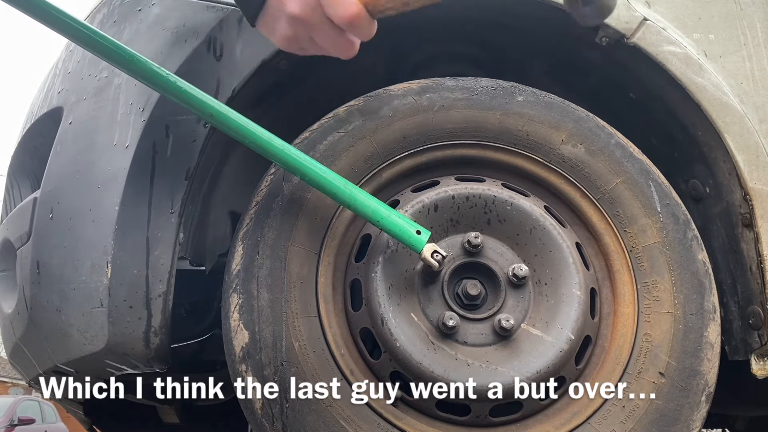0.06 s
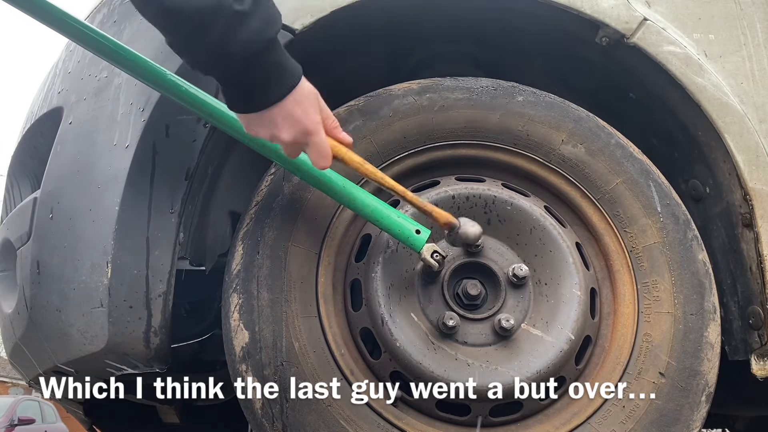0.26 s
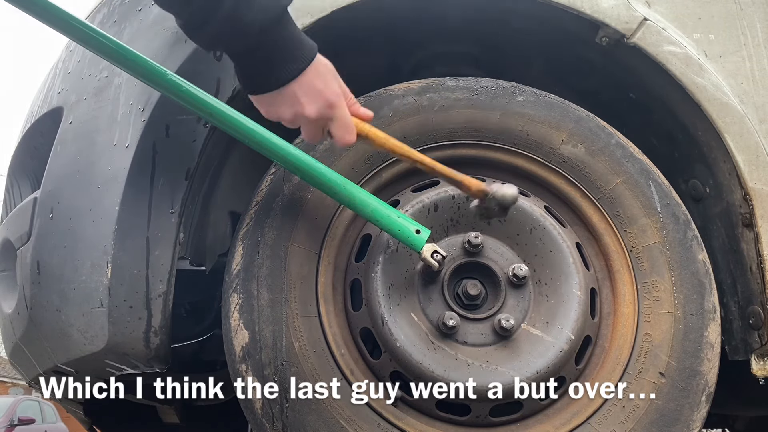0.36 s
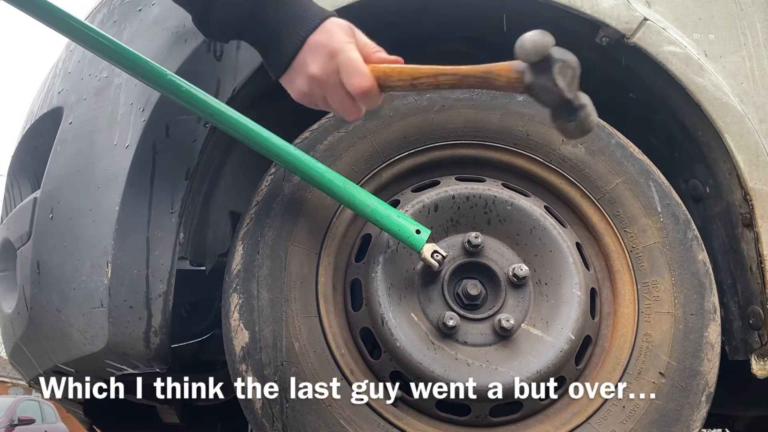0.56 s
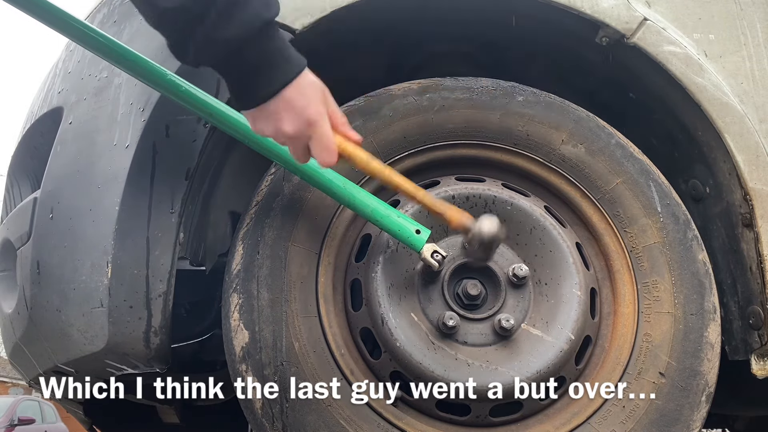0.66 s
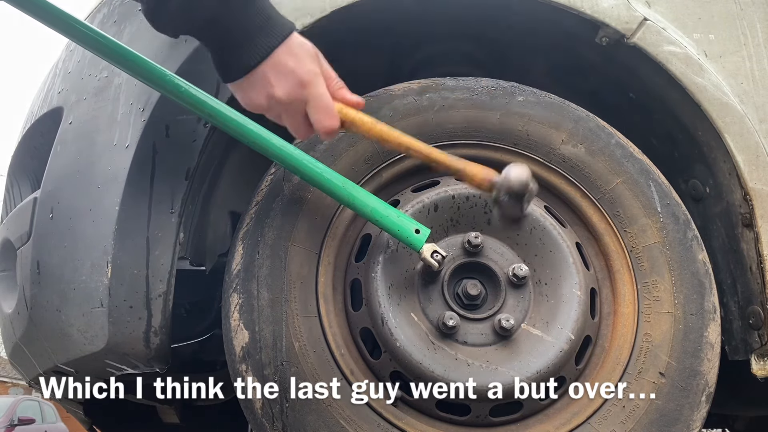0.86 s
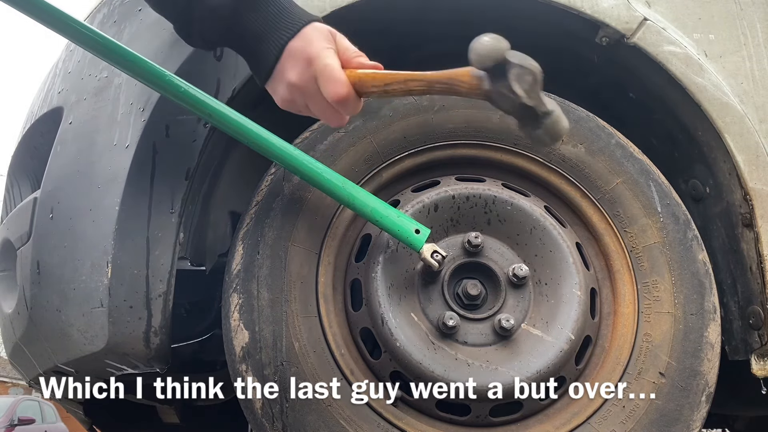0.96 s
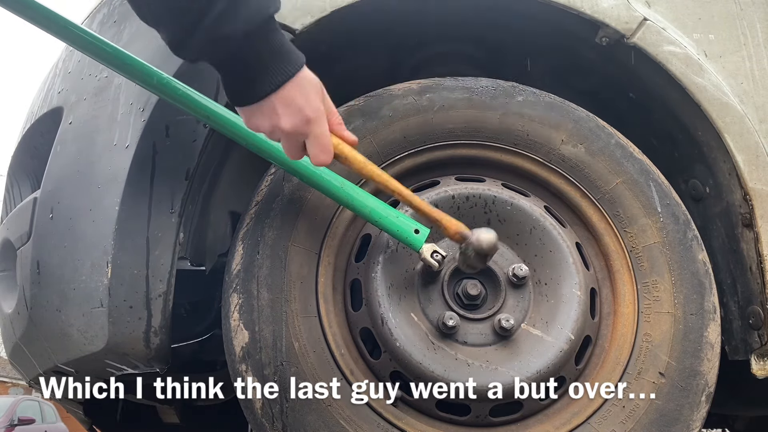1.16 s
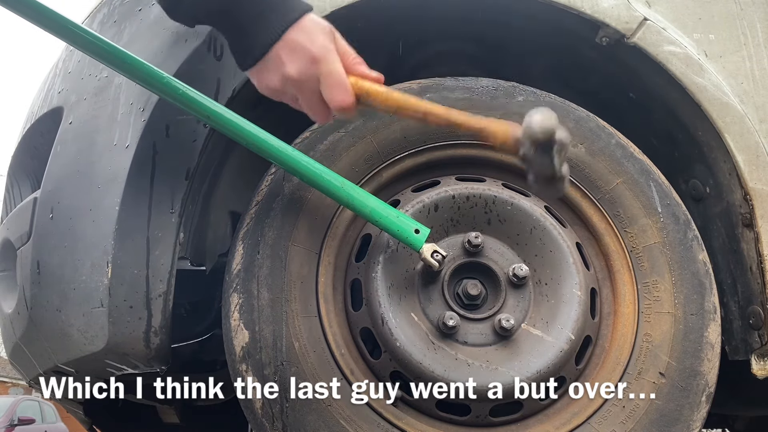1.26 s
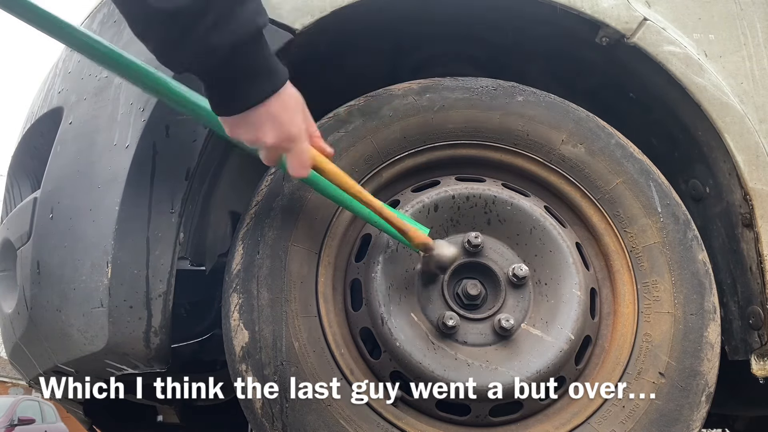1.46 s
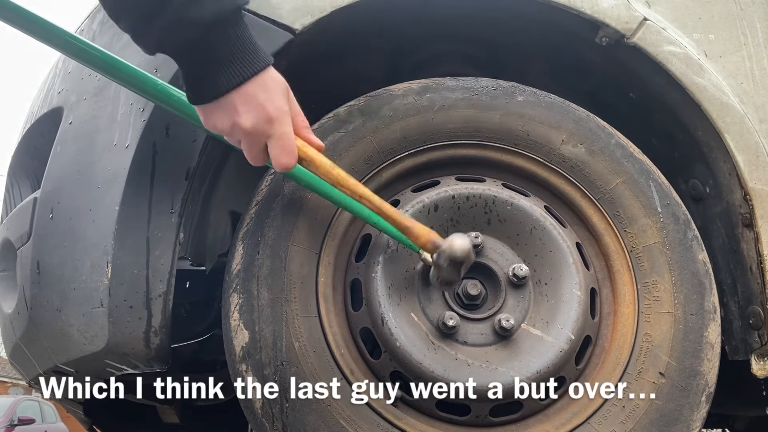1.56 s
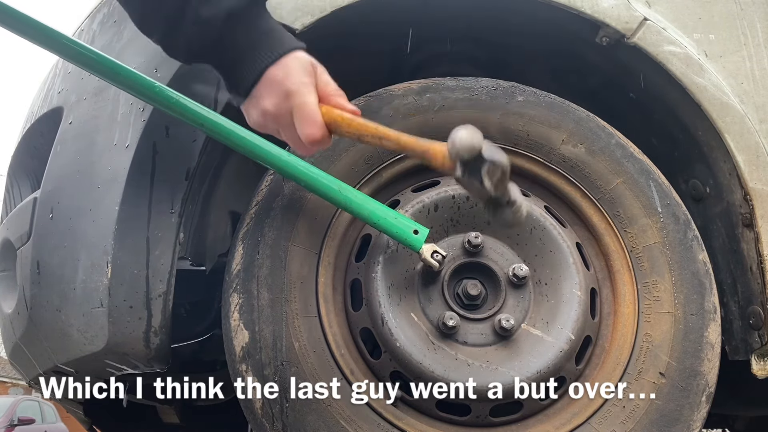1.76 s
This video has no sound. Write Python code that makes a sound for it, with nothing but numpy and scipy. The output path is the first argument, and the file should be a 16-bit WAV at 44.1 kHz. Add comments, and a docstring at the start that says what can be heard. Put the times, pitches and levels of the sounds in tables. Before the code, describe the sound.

A hammer strikes steel four times, each a sharp metallic clank with a thin ring.

```python
"""Hammering on a wheel nut

A hammer strikes a long steel bar, seated in a socket on a car's wheel nut, four times. Each blow is a hard
crack, a thud that falls in pitch as it spreads through wheel and tyre, a short clank and a thin ring of
steel. The car and nearby walls throw it back over a low rumble; a limiter ducks and recovers."""
import sys
import numpy as np
from scipy import signal
from scipy.fft import rfft, irfft
from scipy.io import wavfile
from scipy.ndimage import uniform_filter1d, minimum_filter1d

SR = 44100
rng = np.random.default_rng(int(sys.argv[2]) if len(sys.argv) > 2 else 0)


def wav_record(signal):
    """Record a signal, one row per channel, as 16-bit PCM in the file named by sys.argv[1]."""
    frames = np.transpose(np.atleast_2d(signal))
    bounded = np.clip(frames, -1, 1)
    # unit amplitude maps onto the largest positive 16-bit level
    quanta = np.round(bounded * 32767).astype(np.int16)
    wavfile.write(sys.argv[1], SR, quanta)


N = 79380
FREQS_HZ = np.fft.rfftfreq(N, 1 / SR)
LEFT_RIGHT = np.array([[.5], [-.5]])


def amp(db):
    """Decibels to gain."""
    return 10 ** (np.asarray(db) / 20)


def curve(points, hz):
    """Reads a table on a log-frequency axis."""
    knots_hz, values = np.transpose(points)
    return np.interp(np.log(hz + 1), np.log(knots_hz + 1), values)


def add(mix, start_s, sound):
    """Mixes a sound in from start_s."""
    part = mix[:, round(start_s * SR):]
    part += sound[..., :part.shape[1]]


def fade(t, t60):
    """Falls by 60 dB in t60 seconds."""
    return np.exp(-np.log(1000) * t / t60)


def noise(spectrum, likeness, eq_db=0):
    """Stereo noise with a given spectrum and left-right likeness, at unit rms before the EQ."""
    left, other = rfft(rng.standard_normal((2, N)))
    same, gain = curve(likeness, FREQS_HZ), amp(curve(spectrum, FREQS_HZ))
    pair = np.array([left, same * left + np.sqrt(1 - same ** 2) * other])
    return irfft(pair * gain * amp(eq_db) / np.sqrt(np.mean(gain ** 2)), N)


def tail(spectrum, likeness, decays):
    """Noise whose bands die at their own speeds."""
    hz, t, bands = signal.stft(noise(spectrum, likeness), SR, nperseg=1024, noverlap=768)
    bands *= fade(t, curve(decays, hz)[:, None])
    return signal.istft(bands, SR, nperseg=1024, noverlap=768)[1][:, :N]


def modes(t, table, rise_s=.0005, spread_rad=1.3, wide_hz=1500):
    """Dying sines; the high ones reach left and right out of step."""
    out = np.zeros((2, N))
    for (hz, db, t60), (phase, side) in zip(table, rng.random((len(table), 2))):
        apart = np.sign(side - .5) * spread_rad * min(hz / wide_hz, 1) * LEFT_RIGHT
        out += amp(db) * fade(t, t60) * np.sin(2 * np.pi * (hz * t + phase) + apart)
    return out * np.minimum(t / rise_s, 1)


# Dark background bed: freq_hz, level_db
RUMBLE_SPECTRUM = [(20, -22.5), (62, -5), (90, -5), (125, -6.5), (200, -16), (400, -21.5), (900, -22.5),
                   (1200, -34), (2700, -33.5), (5000, -47), (10000, -50), (16000, -65.5)]
# Distant stereo image, centred lows and wide highs: freq_hz, likeness
FAR_IMAGE = [(60, .98), (150, 1), (350, 0.38), (700, 0.041), (2000, 0.015), (14000, .02)]
def rumble():
    """A faint, steady low rumble."""
    return amp(-56) * noise(RUMBLE_SPECTRUM, FAR_IMAGE)


# Tick cue: start_s, level_db, t60_s
TOOL_TICK = (.0665, -49, 0.014)
# Its thin tone: freq_hz, level_db
TICK_SPECTRUM = [(1500, -26), (2800, 11), (4000, -10), (6500, 0), (10000, -40)]
# Close-up stereo image: freq_hz, likeness
CLOSE_IMAGE = [(100, 0.77), (400, 0.6), (900, 0.93), (2000, 0.55), (5000, 0.036), (14000, .1)]
def tool_tick(t, t60):
    """The tool gives a tiny tick before the first blow."""
    return fade(t, t60) * noise(TICK_SPECTRUM, CLOSE_IMAGE)


# Tone of the early reflections and of the walls' tail: freq_hz, level_db
EARLY_SPECTRUM = [(40, 6), (150, -3), (450, 0.5), (930, -2), (1130, -18), (1400, -7), (1900, -16),
                  (2800, -3.5), (3400, -21), (4400, -16), (7400, -16.5), (8500, -30), (10000, -16),
                  (12400, -41.5), (14400, -21.5), (15800, -47.5)]
ROOM_SPECTRUM = [(30, 5), (65, 18), (130, 11), (220, 2), (600, 0), (960, -5), (1130, -22.5), (1420, -2),
                 (1800, -14.5), (2750, -4.5), (3400, -11.5), (5500, -10.5), (7500, -13), (8500, -25),
                 (10000, -6.5), (12400, -28), (14300, -21.5), (15800, -37.5)]
# Their decay times: freq_hz, t60_s
EARLY_DECAY = [(100, 0.16), (600, 0.12), (3000, 0.13), (8000, .14), (15000, 0.16)]
ROOM_DECAY = [(60, 1), (250, 0.82), (1000, 0.84), (3000, 0.74), (7000, 0.73), (14000, 0.39)]
def reflections(t, room_db, early_rise_s=.009, room_rise_s=.021, bass_hz=127):
    """A quick spray off the car body and floor, then a long tail that booms more as room_db rises."""
    early = amp(1) * np.minimum(t / early_rise_s, 1) * tail(EARLY_SPECTRUM, CLOSE_IMAGE, EARLY_DECAY)
    room = tail(ROOM_SPECTRUM, FAR_IMAGE, ROOM_DECAY)
    bass = 1 / (1 + (FREQS_HZ / bass_hz) ** 4)
    room = irfft(rfft(room) * amp(room_db * (1 + .83 * bass)), N)
    return early + amp(-31) * np.minimum(t / room_rise_s, 1) * room


# The bar's note, a close pair of bending modes: pitch_hz, level_db, t60_s
BAR_MODES = [(2605, -27, .56), (2714, -14.5, .27)]
# Further modes of the bar ringing on: pitch_hz, level_db, t60_s
RING_MODES = [(587, -39, .62), (990, -43, .62), (1362, -31, .3), (2369, -33, .3), (2947, -33, .28),
              (4134, -33, .25), (5526, -32, .27), (7386, -25, .23), (7493, -23, .27), (11295, -40, .26)]
def steel_ring(t, bar_db, high_db, split_hz=5000):
    """The steel rings on; where the hammer lands sets the share of bar note and high modes."""
    note = sum(amp(db + bar_db) * fade(t, t60) * np.sin(2 * np.pi * hz * t) for hz, db, t60 in BAR_MODES)
    return note + modes(t, [(hz, db + high_db * (hz > split_hz), t60) for hz, db, t60 in RING_MODES])


# Socket and wheel resonances: pitch_hz, level_db, t60_s
CLANK_MODES = [(170.6, -12.5, 0.21), (407, -38.5, 0.23), (569.7, 5, 0.088), (782.5, -25, 0.23),
               (868.3, 11, 0.04), (1368, -12.5, 0.15), (2910, -16, 0.088), (3908, -24.5, 0.18),
               (4970, -35.5, .08), (8770, -4.5, 0.067), (10200, -17, 0.083)]
def clank(t):
    """Socket and wheel sound briefly, heavily damped."""
    return modes(t, CLANK_MODES)


def thud(t, fall_s, top_hz=893.3, end_hz=50.36, rise_s=.0038, decay_s=.008):
    """Bending waves arrive high notes first: a quick downward sweep."""
    hz = end_hz + (top_hz - end_hz) * np.exp(-t / fall_s)
    envelope = np.minimum(t / rise_s, 1) * np.exp(-np.maximum(t - fall_s, 0) / decay_s)
    return amp(8.5) * envelope * np.sin(2 * np.pi * np.cumsum(hz) / SR)


def tyre_thump(t, pitch_hz=56, rise_s=.0031):
    """The tyre takes the blow with a soft thump."""
    return amp(2.5) * t / rise_s * np.exp(-t / rise_s) * np.sin(2 * np.pi * pitch_hz * t)


# Brief tones that give each blow its own colour: start_s, pitch_hz, level_db
ACCENT_TONES = [(.2525, 2240, -25), (.2525, 2697, 13.5), (.2525, 4300, 12), (.2525, 6420, 11.5),
                (.7025, 1690, -0.5), (.7025, 2548, -2.5), (.7025, 5540, -5), (.7025, 5940, 4),
                (1.0964, 1325, 4.5), (1.0964, 2778, 1.5), (1.0964, 9360, 5), (1.4812, 1331, -2.5),
                (1.4812, 2060, -3), (1.4812, 4150, -5), (1.4812, 9880, -36.5)]
# Panning of accents and crack: freq_hz, left_minus_right_db
IMPACT_PAN = [(400, -3.5), (1400, -4), (2600, -9), (5000, 4.5), (14000, -3)]
def accent(t, hz, db, t60=.03):
    """One quickly dying tone, panned by its pitch."""
    return modes(t, [(hz, db, t60)]) * amp(curve(IMPACT_PAN, hz) * LEFT_RIGHT)


# Tone of the socket's chatter and of the bright snap: freq_hz, level_db
CHATTER_SPECTRUM = [(100, 1), (300, -11.5), (600, -16.5), (1100, -10.5), (1900, -4.5), (2700, -13.5),
                    (3400, -14), (4400, -8), (6500, -5), (8300, -11.5), (10000, 4), (12200, -19.5),
                    (14400, -7.5), (16500, -33)]
SNAP_SPECTRUM = [(300, -23), (1500, 1), (4000, -16), (7000, 6.5), (10000, 6), (12000, -7.5), (14200, 12.5),
                 (16500, -25)]
def crack(t, swell_s, chatter_s, mids_db, treble_db, snap_db, mids_hz=2920, treble_hz=9600):
    """Steel snaps on steel at t = 0; the socket chatters on the nut for a few milliseconds."""
    bell = np.exp(-np.log2((FREQS_HZ + 1) / mids_hz) ** 2 / 2)
    shelf = FREQS_HZ ** 4 / (FREQS_HZ ** 4 + treble_hz ** 4)
    eq_db = mids_db * bell + treble_db * shelf + curve(IMPACT_PAN, FREQS_HZ) * LEFT_RIGHT
    flutter = uniform_filter1d(rng.standard_normal(N), size=36)
    chatter = noise(CHATTER_SPECTRUM, CLOSE_IMAGE, eq_db) * amp(4 * flutter / flutter.std())
    mids = signal.sosfilt(signal.butter(4, 6900, fs=SR, output="sos"), chatter)
    swell = mids * np.exp(np.minimum(t, 0) / swell_s)  # leads into the hit
    dying = chatter * fade(np.maximum(t - chatter_s, 0), t60=.03)
    snap = amp(snap_db - 3) * (t >= 0) * fade(abs(t), t60=.036) * noise(SNAP_SPECTRUM, CLOSE_IMAGE)
    return amp(2.5) * np.where(t < 0, swell, dying) + snap


# Hammer cues with trims per layer: start_s, level_db, swell_s, chatter_s, mids_db, treble_db,
# snap_db, thud_db, fall_s, clank_db, room_db
HAMMER_BLOWS = [(0.2527, 4, 0.0023, 0.0092, 6.5, -9.5, 7.5, -0.5, 0.0043, -4.5, 2),
                (0.7011, -7, 0.0025, 0.0037, 8.5, -4.5, 13, 2, 0.0049, 0, -3),
                (1.0962, -8.5, 0.0024, 0.0058, 4.5, -6.5, 7, 1, 0.0041, 0, 1),
                (1.4808, -9, 0.0024, 0.0037, 1, 10.5, -3.5, -0.5, 0.00543, 0, -0.5)]
# Ring trims per blow: bar_db, high_db
RING_TRIMS = [(-2.5, -4), (-4, -10), (-16, 4), (-11, 5)]
def scene():
    """Four blows and a tick over a low rumble."""
    t = np.arange(N) / SR
    mix = rumble()
    for blow, (bar_db, high_db) in zip(HAMMER_BLOWS, RING_TRIMS):
        start_s, level_db, *crack_shape, thud_db, fall_s, clank_db, room_db = blow
        mix += amp(level_db) * crack(t - start_s, *crack_shape)
        body = amp(thud_db) * (thud(t, fall_s) + tyre_thump(t)) + amp(clank_db) * clank(t)
        sustain = steel_ring(t, bar_db, high_db) + reflections(t, room_db)
        add(mix, start_s, amp(level_db) * (body + sustain))
    for start_s, pitch_hz, level_db in ACCENT_TONES:
        add(mix, start_s, accent(t, pitch_hz, level_db))
    start_s, level_db, t60 = TOOL_TICK
    add(mix, start_s, amp(level_db) * tool_tick(t, t60))
    return mix


def record(dry):
    """A look-ahead limiter ducks the blows and recovers slowly; then a soft clip and a high cut."""
    threshold_db, recover_db_per_s, ceiling, cutoff_hz = -10.5, 79, .95, 16400
    power_db = 10 * np.log10(abs(uniform_filter1d((dry ** 2).mean(0), size=300)) + 1e-12)
    over_db = -minimum_filter1d(-np.maximum(power_db - threshold_db, 0), size=400)  # peak hold
    recovery_db = np.arange(N) * recover_db_per_s / SR
    duck_db = uniform_filter1d(np.maximum.accumulate(over_db + recovery_db) - recovery_db, size=130)
    clipped = ceiling * np.tanh(dry * amp(-duck_db) / ceiling)
    high_cut = signal.firwin(255, cutoff_hz, window=("kaiser", 9), fs=SR)
    return signal.oaconvolve(clipped, high_cut[None], "same")


dry = scene()
out = record(dry)
wav_record(out)
```